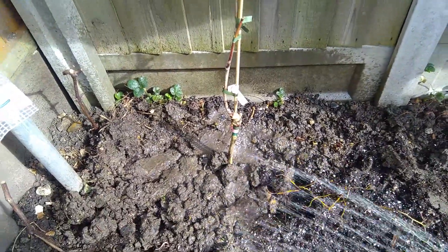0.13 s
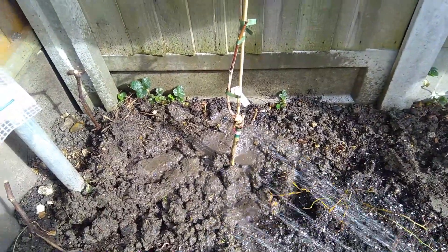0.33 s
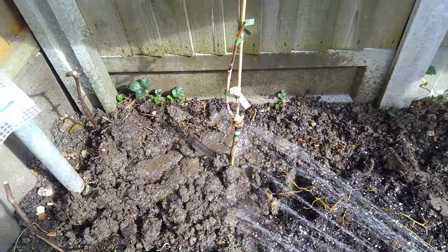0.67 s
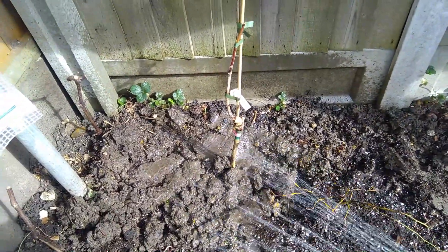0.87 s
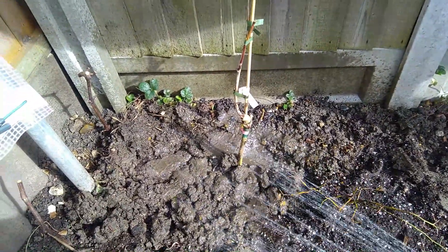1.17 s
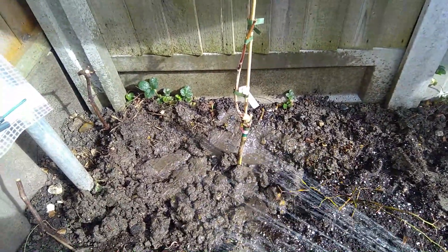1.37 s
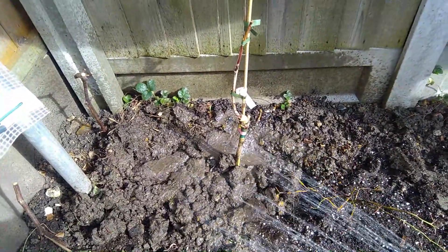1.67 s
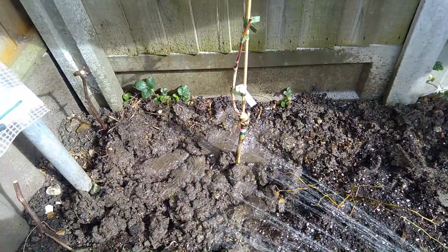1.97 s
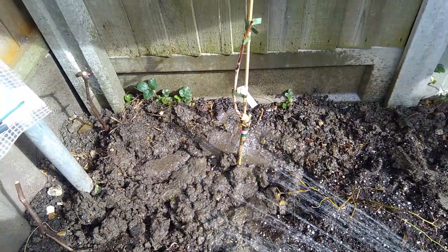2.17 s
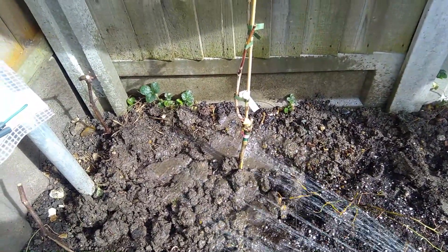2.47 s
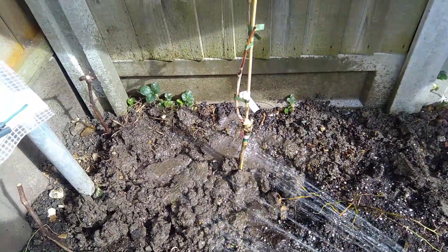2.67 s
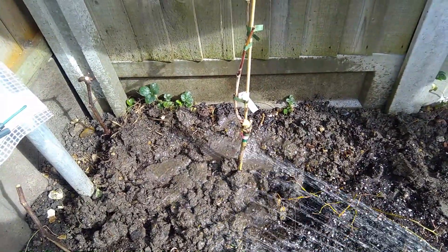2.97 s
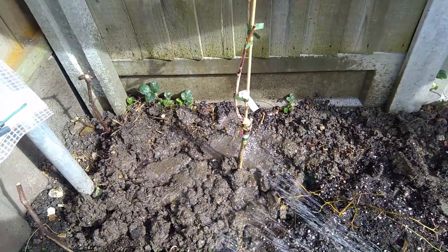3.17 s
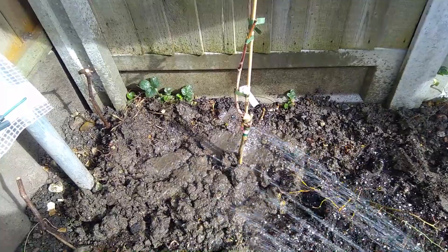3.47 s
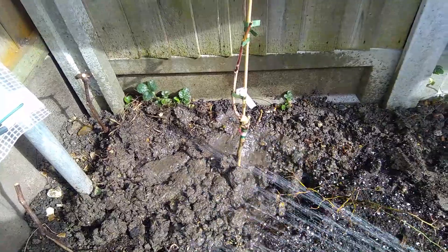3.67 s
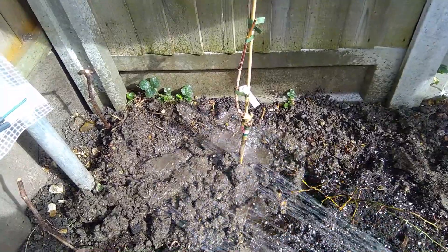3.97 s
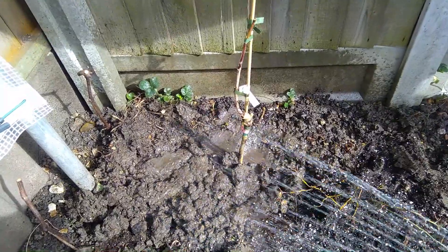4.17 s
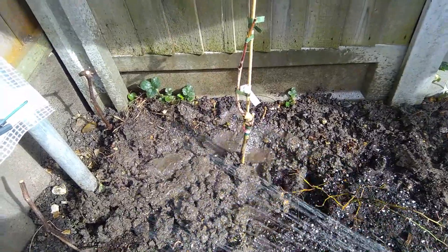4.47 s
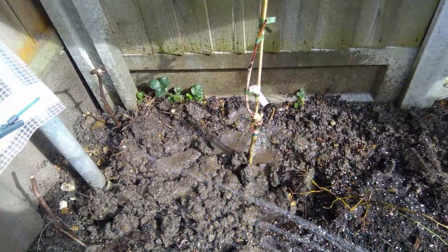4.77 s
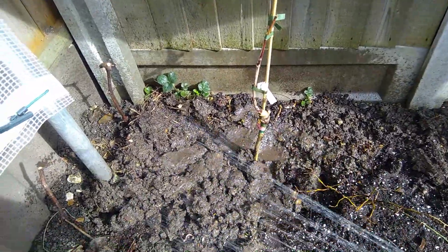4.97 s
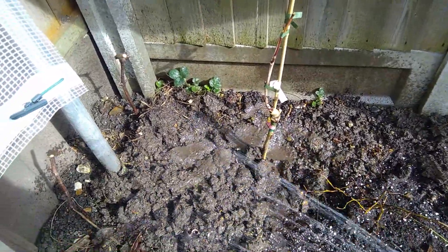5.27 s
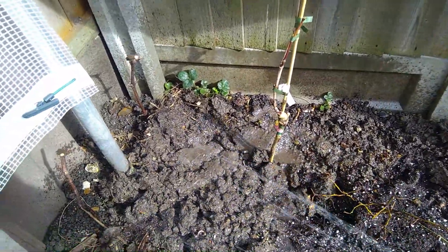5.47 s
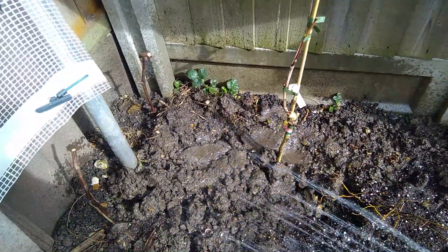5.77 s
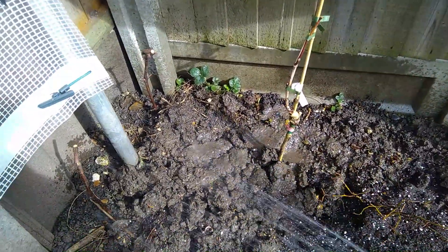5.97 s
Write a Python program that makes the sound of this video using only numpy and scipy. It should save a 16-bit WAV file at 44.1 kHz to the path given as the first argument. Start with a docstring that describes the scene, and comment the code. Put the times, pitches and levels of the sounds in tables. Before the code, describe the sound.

Fine jets of water sprinkle onto wet muddy soil close by, a bright fizzing hiss with crackly spits, tiny ticks and faint puddle plops.

```python
"""Beside a fence, fine jets from a watering rose sprinkle wet soil, close to a phone's left port.
Noise shaped by random droplet impacts, with ringing bubbles, makes a bright fizz in seven pitch slices.
Clumps of water splash with a crack and a spitting tail, and single drops tick as short tone bursts.
Puddles plop with rising sines and a faint hollow note swells once; at the end the jets swing close.
Far behind, narrow bands of noise make a town rumble with soft thuds and an engine hum."""
import sys
import numpy as np
from scipy import signal
from scipy.fft import rfft, irfft, next_fast_len
from scipy.io import wavfile
from scipy.ndimage import uniform_filter1d

SR = 44100
rng = np.random.default_rng(int(sys.argv[2]) if len(sys.argv) > 2 else 0)


def bounce(signal):
    """Save signal as a 16-bit WAV file at the path given by the first command-line argument."""
    frames = np.transpose(np.atleast_2d(signal))
    limited = np.clip(frames, -1, 1)
    pcm = np.round(limited * 32767).astype(np.int16)
    wavfile.write(sys.argv[1], SR, pcm)


N = 269214

# How the jets change. Each row: time in seconds, relative fizz level in dB, extra coarse drops in dB,
# left minus right in dB.
JETS = [(0.0, -57, -0.5, 8.5), (0.85, -56.5, 4, 11), (1.2, -54, 3.5, 9.5), (1.5, -53, 11, 7.5),
        (1.75, -53, 7.5, 10.5), (2.1, -54, 11, 6), (2.3, -53, 6, 7.5), (2.55, -52, 3.5, 10),
        (2.87, -53, 1, 9.5), (3.3, -60, 6, 9.5), (3.6, -62, 2.5, 10), (3.84, -57.5, 6.5, 9.5),
        (4.2, -57, 2, 10), (4.9, -64, 4.5, 9), (5.2, -57, 1, 10), (5.75, -63, 4, 8.5), (6.105, -46, 12, 9)]
# The slices of the spectrum: water washing over mud, then droplets from coarse to finest.
# Each number: an edge between two slices in Hz.
SLICE_EDGES_HZ = [840, 2700, 4400, 5900, 8100, 10000, 12500, 16000]
# The tables below hold one number for each slice, lowest slice first.
# How much more each size favours the left port, in dB.
SIZE_PAN_DB = [-5.5, -5.0, -4.5, -2.0, -1.0, 0.5, 2.0]
# Relative level of the wash and of each droplet size in an even spray, in dB.
SIZE_DB = [-25, -23, -24.5, -11, -12, -2, -1]
# How far each size follows the extra coarse drops, in dB per dB.
COARSE_SHARE = [0, 0.79, 0.75, 1.27, 1.02, 0., 0.08]
# Change of each slice in the steady fizz, in dB; the middle slices are weakest.
FIZZ_TILT_DB = [-2.5, -3, -3, -9.5, -6.5, -4, -3.5]
# How far the hiss of each slice flickers, as a spread in dB.
SLICE_FLICKER_DB = [1.5, 1.3, 2.0, 2.8, 1.9, 0.55, 0.94]
# How many separate drops of each size fall, in drops per second.
PATTER_PER_S = [150., 90., 110., 150., 250., 900., 1500.]
# How alike each size sounds at the two ports, from 0 for unlike to 1 for the same.
SIZE_ALIKE = [0.39, 0.19, 0.018, 0., 0., 0., 0.096]
# Change of a splash's crack in each slice, in dB; a crack holds little bass.
CRACK_DB = [-20, -10, -3, 0, 0, 0, 0]
CRACK_FAR_DB = -6.0  # further change of the crack at the right port
SCATTER_S = 0.003  # how long soil and fence smear the sound for the far port
PATTER_S, PATTER_SHARE = .004, .5  # time constant of each wet grain; the grains' share of the power
LOWEST_DIP = -0.8  # the flicker dips no lower than this many spreads


def spray():
    """The left port faces the water; the right hears it later and scattered off soil and fence."""
    fizz_db, coarse_db, pan_db = curve(JETS)
    flicker_db = walk(14.)
    drops = droplets()
    tails, cracks = splashes(pan_db)
    tails = tails + gush(pan_db)
    out = 0
    for k, (lo, hi) in enumerate(zip(SLICE_EDGES_HZ, SLICE_EDGES_HZ[1:])):
        slice_flicker_db = SLICE_FLICKER_DB[k] * np.maximum(walk(21.99), LOWEST_DIP)
        size_db = SIZE_DB[k] + FIZZ_TILT_DB[k] + COARSE_SHARE[k] * coarse_db
        db = fizz_db + flicker_db + size_db + slice_flicker_db
        power = (ports(pan_db + SIZE_PAN_DB[k]) * undb(db)) ** 2 + tails[:, k]
        power = power * (1 - PATTER_SHARE + PATTER_SHARE * patter(PATTER_PER_S[k]))
        power[1] = smear(power[1], SCATTER_S)

        left, right = level(share(drops, lo, hi), 0)
        alike = np.clip(SIZE_ALIKE[k], 0, 1)
        far = alike * left + np.sqrt(1 - alike ** 2) * right
        wet = np.sqrt(power) * [left, far]
        crack_gain = undb(CRACK_DB[k] + np.array([[0], [CRACK_FAR_DB]]))
        out = out + band(wet, lo / 2, 2 * hi, order=2)
        out = out + share(cracks[:, k], lo, hi) * crack_gain
    return out


def droplets():
    """Droplet impacts crackle, and the air bubbles they trap ring briefly on top."""
    drops = crackle(per_s=900., spread_db=3.3, mist_db=1.0, ring_s=.0003)
    fizzle = bubbles(2500., 9000., cycles=8., spread_db=1.5, count=8000, size=300)
    return level(drops, 0) + undb(-7.) * fizzle


def crackle(per_s, spread_db, mist_db, ring_s):
    """Droplet impacts at random moments, a few much larger, over fine mist; blurred at the far port."""
    sizes_db = spread_db * np.minimum(rng.exponential(size=N), 4.0)
    hits = (rng.random(N) < per_s / SR) * undb(sizes_db)
    bursts = smear(hits ** 2, ring_s)
    bursts = np.array([bursts, smear(bursts, 0.024)]) / bursts.mean()
    return rng.standard_normal((2, N)) * np.sqrt(bursts + undb(2 * mist_db))


def bubbles(lo_hz, hi_hz, cycles, spread_db, count, size=800):
    """Tiny trapped bubbles, each ringing some cycles on a rising note, other ones at each port."""
    where, pitch, chance = rng.random((count, 3)).T
    hz = lo_hz * (hi_hz / lo_hz) ** pitch
    turns = hz[:, None] * np.arange(size) / SR
    ring = np.exp(-turns / cycles) * np.sin(2 * np.pi * turns * (1 + 0.00054 * turns))
    ring *= undb(-spread_db * np.log(chance + 0.0048))[:, None]  # a few are much louder
    # Both ports lie end to end in one long row while the rings are added up.
    places = (where * 2 * N).astype(int)[:, None] + np.arange(size)
    out = np.bincount(places.ravel(), ring.ravel(), 2 * N + size)
    return level(out[:2 * N].reshape(2, N), 0)


def patter(per_s):
    """Separate drops of uneven strength: a power envelope of short dying grains, near 1 on average."""
    grains = (rng.random(N) < per_s / SR) * rng.exponential(size=N)
    return smear(grains, PATTER_S) * SR / per_s


# Clumps of water. Each row: start in seconds, relative tail level in dB, crack over tail in dB,
# pitch of the commonest drops in octaves over 1 kHz, spread of sizes in octaves,
# time for the tail to fall 60 dB in seconds (the last two have a smallest value).
CLUMPS = [(0.0463, -55.5, 7.3, 1.53, 0.072, 0.46), (0.0694, -51.5, 14, 2.6, 0.49, 0.18),
          (0.1364, -55, 9.3, 2.73, 0.46, 0.25), (0.2795, -42, 11, 3.39, 0.25, 0.25),
          (0.3905, -49, 10, 3.3, 0.37, 0.042), (0.402, -54.5, 10, 1.24, 0.29, 0.14),
          (0.4784, -60.5, 3.3, 3.25, 0.2, 0.26), (0.549, -60, 2.5, 2.56, 0.15, 0.45),
          (0.589, -53.5, 5, 2.54, 0.53, 0.1), (0.603, -56, 3, 2.44, 0.42, 0.16),
          (0.664, -64, 3, 1.8, 0.12, 0.067), (0.7467, -65, 19.3, 4.0, 0.2, 0.063),
          (0.796, -52.5, 17.3, 3, 0.98, 0.55), (0.976, -52, 8, 2.46, 0.16, 0.37),
          (1.022, -56, 15.3, 1.36, 1.18, 0.66), (1.25, -45.5, 30, 4.3, 0.42, 0.14),
          (1.29, -41.5, 28.5, 4.6, 0.79, 0.22), (1.306, -53, 8.5, 2.23, 0.22, 0.23),
          (1.3175, -44, 7.3, 4.4, 0.14, 0.098), (1.364, -37.5, 14, 3.62, 0.13, 0.13),
          (1.441, -41.5, 7.3, 3.66, 0.084, 0.33), (1.464, -32.5, 19, 4.7, 0.1, 0.038),
          (1.5285, -44.5, 17, 2.97, 0.24, 0.3), (1.5525, -64, 11.3, 3.9, 0.22, 0.073),
          (1.657, -57, 9.3, 2.06, 0.21, 0.25), (1.769, -50, 6, 2.1, 0.41, 0.21),
          (1.79, -48, 1.3, 2.72, 0.28, 0.4), (1.801, -50, 1.3, 3, 0.5, 0.11),
          (1.8594, -57, -0.7, 1.7, 0.27, 0.076), (1.9256, -47, 9.3, 2.9, 0.36, 0.33),
          (1.9533, -60, 12, 2.8, 0.21, 0.1), (2.008, -49.5, 9.3, 2.23, 0.48, 0.38),
          (2.0326, -46.5, 9, 2.7, 0.25, 0.11), (2.0494, -46, 9.3, 3.1, 0.16, 0.11),
          (2.092, -49, 0, 2.84, 0.31, 0.23), (2.14, -52.5, -1.5, 3.5, 0.25, 0.12),
          (2.203, -46.5, 17, 4.3, 1.1, 0.059), (2.215, -56, 4.5, 2.6, 0.17, 0.58),
          (2.2644, -51, 7.3, 5.1, 1, 0.13), (2.3194, -54, 3.3, 5.7, 0.91, 0.09),
          (2.535, -62.5, 11.3, 1.06, 0.4, 0.29), (2.6209, -48.5, 15.3, 3.25, 0.22, 0.065),
          (2.781, -55, 5.5, 2.57, 0.18, 0.28), (2.8105, -50, 13.3, 2.8, 0.5, 0.053),
          (2.8943, -53, 26, 4.0, 0.29, 0.062), (3.035, -55.5, 3, 2.18, 0.58, 0.37),
          (3.303, -57.5, 13.3, 3, 0.65, 0.13), (3.3977, -58, 13.3, 4.3, 0.31, 0.18),
          (3.419, -54, 29, 4.1, 0.2, 0.09), (3.47, -53.5, 15, 4.7, 0.27, 0.066),
          (3.5025, -54.5, 4, 3.65, 0.4, 0.19), (3.5638, -59, 23, 3.8, 0.9, 0.44),
          (3.6044, -56, 7.3, 1.5, 1.5, 0.64), (3.662, -40.5, 1.3, 3.035, 0.13, 0.1),
          (3.6704, -38.5, 9.3, 3.9, 0.36, 0.12), (3.6964, -50.5, 9.3, 2.5, 0.48, 0.42),
          (3.7276, -52, 11.3, 1.5, 1.05, 0.55), (3.7804, -55.5, 3.3, 1.3, 0.41, 0.16),
          (3.8427, -53.5, 15, 2.8, 0.63, 0.85), (3.917, -50.5, 11.3, 2.8, 0.57, 0.09),
          (4.149, -57.5, 17, 2.5, 0.73, 0.31), (4.264, -56, 15.3, 3.6, 0.37, 0.11),
          (4.348, -52, 23, 4.0, 0.27, 0.09), (4.4294, -55, 3.3, 2.7, 0.59, 0.33),
          (4.548, -45.5, 10, 2.93, 0.33, 0.1), (4.555, -36, 8, 3.32, 0.24, 0.13),
          (4.595, -45, 18, 3.47, 0.35, 0.17), (4.744, -54.5, 7, 1.2, 1.4, 0.11),
          (4.9587, -40, 25, 4.5, 0.13, 0.067), (4.998, -47.5, 27.5, 3.7, 0.13, 0.07),
          (5.088, -59.5, 3, 2.78, 0.42, 0.57), (5.143, -43.5, 11, 3.5, 0.3, 0.1),
          (5.219, -47.5, 8, 2.87, 0.34, 0.29), (5.238, -42.5, 8, 3, 0.28, 0.15),
          (5.2706, -49, 7.3, 3.1, 0.18, 0.14), (5.47, -56, 0, 4.4, 0.42, 0.3),
          (5.5553, -54.5, 20.5, 3.5, 0.38, 0.069), (5.609, -63, 11.3, 2.1, 0.24, 0.12),
          (5.822, -50, 5, 3.65, 0.097, 0.17), (5.9549, -60, 9.5, 5.8, 0.42, 0.55),
          (6.0955, -28, 0, 3.64, 0.18, 0.07)]
STRAY_DB = -21  # drops of every other size that come along in a splash
LEAD_S, LEAD_SHARE = .004, .08  # the first drops arrive ahead of each clump: time constant, share of power


def splashes(pan_db):
    """Per port and droplet size: the power of lead-in and tail, and the sharp crack between them."""
    t = np.arange(N) / SR
    tails = np.zeros((2, len(SIZE_PAN_DB), N))
    cracks = np.zeros_like(tails)
    # A crack lasts under a millisecond and opens with one hard edge.
    burst = rng.choice([-1., 1.], (len(CLUMPS), 40)) * 0.4 * np.exp(-np.arange(40) / 9)
    burst[:, 0] = 1.5
    for (s, db, crack_db, pitch, spread, t60), snap in zip(CLUMPS, burst):
        i = min(int((s + .001) * SR), N - 40)  # the crack comes just after the onset
        gains = ports(pan_db[i] + np.array(SIZE_PAN_DB)) * undb(db) * sizes(pitch, spread, STRAY_DB)
        near = slice(max(i - SR // 20, 0), i + SR // 3)
        since = t[near] - t[i]
        lead = LEAD_SHARE * np.exp(np.minimum(since, 0) / LEAD_S)
        tail = undb(-120 * since / max(t60, .02))  # 120 because this is a power
        tails[:, :, near] += gains[..., None] ** 2 * np.where(since < 0, lead, tail)
        cracks[:, :, i:i + 40] += gains[..., None] * undb(crack_db) * snap
    return tails, cracks


def sizes(pitch, spread, stray_db):
    """Gain of each droplet size in a clump of water: most near one size, a few strays of all."""
    # Middle of each slice, in octaves over 1 kHz
    octave = np.log2(np.multiply(SLICE_EDGES_HZ[1:], SLICE_EDGES_HZ[:-1]) / 1e6) / 2
    common = np.exp(-((octave - min(pitch, octave[-1])) / max(spread, .1)) ** 2 / 2)
    power = undb(2 * np.array(SIZE_DB)) * (common + undb(2 * stray_db))
    return np.sqrt(power / power.sum())


GUSH_S, GUSH_RISE_S, GUSH_DB = 5.97, 0.03, -35  # the jets swing close and stay
GUSH_OCTAVES, GUSH_SPREAD = 4.5, 0.42  # commonest drops in octaves over 1 kHz, spread in octaves
GUSH_STRAY_DB = -4  # the close jets churn more mud


def gush(pan_db):
    """Per port and droplet size: the power of the jets close by, rising quickly and then steady."""
    rise = np.clip((np.arange(N) / SR - GUSH_S) / GUSH_RISE_S, 0, 1) ** 2
    mix = sizes(GUSH_OCTAVES, GUSH_SPREAD, GUSH_STRAY_DB)
    gains = ports(pan_db[-1] + np.array(SIZE_PAN_DB)) * undb(GUSH_DB) * mix
    return (gains[..., None] * rise) ** 2


# Single drops that snap out of the fizz.
# Each row: time in seconds, peak level at the left before filtering in dB, pitch in Hz.
SINGLE_DROPS = [(0.0106, -43, 12200), (0.0296, -36.6, 13200), (0.0538, -37, 13600), (0.0733, -31.8, 8900),
                (0.2028, -38, 12300), (0.3113, -27, 10600), (0.3631, -41, 12800), (0.391, -28.5, 12100),
                (0.4398, -33, 12500), (0.489, -37, 8800), (0.5349, -41, 13800), (0.5626, -35, 12300),
                (0.5957, -34, 11600), (0.6474, -35.9, 11800), (0.6715, -42, 12900), (0.8308, -34, 11800),
                (0.8482, -30, 12200), (0.8669, -34.1, 12300), (1.0215, -32, 12200), (1.2344, -33, 10700),
                (1.2505, -27, 11000), (1.2654, -30, 13500), (1.4242, -27, 12200), (1.5292, -21, 10500),
                (1.5343, -24, 11300), (1.6413, -31, 10900), (1.6567, -28.0, 13300), (1.7576, -23, 14100),
                (1.9321, -34, 8900), (2.1558, -31, 10100), (2.2067, -26.2, 13600), (2.3247, -37, 12700),
                (2.581, -30.3, 13100), (2.816, -29.5, 12000), (2.8945, -30, 12000), (2.909, -35, 11500),
                (3.0664, -33.1, 12700), (3.138, -29, 12700), (3.2793, -36, 12500), (3.4205, -31, 12500),
                (3.4459, -41, 12700), (3.4729, -41, 12400), (3.4941, -42, 13200), (3.5094, -29, 12300),
                (3.5655, -35, 11500), (3.6272, -32, 11500), (3.7459, -34, 12400), (3.7921, -34, 11800),
                (3.9167, -31, 11900), (4.031, -35, 12200), (4.0727, -42, 13000), (4.1534, -40, 11600),
                (4.1959, -31, 12200), (4.2436, -33, 12100), (4.3308, -43, 13100), (4.3629, -38, 13500),
                (4.439, -40, 11200), (4.55, -23, 12300), (4.5553, -15, 10400), (4.5966, -22, 11100),
                (4.673, -37, 12800), (4.8824, -40.7, 12500), (4.9238, -36, 12700), (4.9605, -26, 13500),
                (5.0062, -31, 14400), (5.0863, -37.3, 13700), (5.1738, -32.3, 12700), (5.2403, -33, 8800),
                (5.2525, -36, 8000), (5.2725, -32, 8000), (5.2816, -31, 10900), (5.5464, -38.1, 12100),
                (5.6149, -35, 13700), (5.6816, -46, 12700), (5.7074, -44, 12200), (5.7446, -36, 13100),
                (5.8252, -37, 13500), (5.9126, -49, 12400), (5.9555, -41.5, 13000)]
TICK_CYCLES = 1.7  # cycles from the middle until the snap has shrunk to 1/e
TICK_FAR_DB = -3.5  # extra change at the right port


def ticks():
    """Each drop is a few cycles of tone at the left port, a weaker scattered puff at the right."""
    out = np.zeros((2, N))
    t = np.arange(-40, 200) / SR
    pan_db = curve(JETS)[-1]
    puffs = rng.standard_normal((len(SINGLE_DROPS), len(t))) * np.exp(-np.abs(t) / 0.0013) * (t > 0)
    for (s, db, hz), puff in zip(SINGLE_DROPS, puffs):
        i = int(s * SR) - 40  # the snap is centred on its time
        snap = np.exp(-(t * hz / TICK_CYCLES) ** 2) * np.cos(2 * np.pi * hz * t)
        far = undb(TICK_FAR_DB - pan_db[i]) * np.convolve(puff, snap, "same") / 2
        out[:, i:i + len(t)] += undb(db) * np.array([snap, far])
    return band(out, 5000., 20000., order=4)


# Puddle gurgles. Each row: start in seconds, level before swell, decay and port gains in dB,
# starting pitch in Hz.
GURGLES = [(0.969, -63, 250), (1.148, -58, 261), (1.201, -55, 312), (1.765, -55.5, 195), (1.77, -55, 260),
           (1.785, -55, 328), (1.825, -53, 260), (1.878, -58.5, 320), (2.185, -52, 201), (2.04, -57.5, 270),
           (2.1, -60, 215), (2.2, -55.5, 235), (2.296, -53.5, 276), (2.88, -57, 300), (2.959, -54.5, 323),
           (2.985, -53.5, 244), (3.459, -67, 197), (3.899, -54, 312), (4.294, -52, 325),
           (4.555, -59.5, 264), (4.62, -56.5, 586), (4.656, -56, 520), (4.672, -54, 610), (4.695, -60, 281),
           (4.72, -68, 690), (4.814, -61, 284)]
PLOP_T60_S, PLOP_RAGGED, PLOP_GLIDE_PER_S = .11, .4, 1.2  # 60 dB decay, depth of wobble, upward glide


def plops():
    """Air pockets in the puddles: short low gurgles on a rising note, a little ragged."""
    out = np.zeros(N)
    t = np.arange(int(.3 * SR)) / SR
    ragged = level(band(rng.standard_normal(N), 5., 40., order=1), 0)
    swell = (1 - np.exp(-t / .012)) ** 2
    for s, db, hz in GURGLES:
        i = int(s * SR)
        note = np.sin(2 * np.pi * hz * t * (1 + PLOP_GLIDE_PER_S * t))
        out[i:i + len(t)] += undb(db - 60 * t / PLOP_T60_S) * swell * note
    return out * (1 + PLOP_RAGGED * ragged) * undb([[4.2], [1.8]])


HOLLOW_START_S, HOLLOW_END_S = 4.5, 5.03
HOLLOW_ATTACK_S, HOLLOW_RELEASE_S = .3, .1
HOLLOW_HZ, HOLLOW_WIDTH_HZ = 775, 35
HOLLOW_DB = -70  # before the swell


def hollow():
    """A faint blurred hollow note: narrow noise that swells slowly and fades faster."""
    t = np.arange(N) / SR
    rise = (t - HOLLOW_START_S) / HOLLOW_ATTACK_S
    fall = (HOLLOW_END_S - t) / HOLLOW_RELEASE_S
    lo, hi = HOLLOW_HZ - HOLLOW_WIDTH_HZ / 2, HOLLOW_HZ + HOLLOW_WIDTH_HZ / 2
    blur = band(rng.standard_normal((2, N)), lo, hi, order=1)
    return level(blur, HOLLOW_DB) * np.clip(np.minimum(rise, fall), 0, 1)


# The far rumble, as points on a curve. Each row: pitch in Hz, relative level in dB per Hz.
TOWN_SPECTRUM = [(59, -31), (100, -7.5), (156, -2), (323, -2), (400, -12), (764, -3), (1960, -19),
                 (2500, -38), (3250, -50), (5500, -120)]
# How alike the rumble is at the two ports. Each row: pitch in Hz,
# likeness from 0 for unlike to 1 for the same (limited to that range).
TOWN_ALIKE = [(60, -0.8), (130, 0.94), (290, 0.78), (640, 0.2), (1410, -4.4), (3100, -3.04), (6820, -0.55),
              (15000, -0.01)]
TOWN_DB = -70  # before a small tilt to the left


def town():
    """Far rumble in third-octave bands of noise that flicker alone; alike at both ports in the bass."""
    f, db = np.transpose(TOWN_SPECTRUM)
    alike_hz, alike = np.transpose(TOWN_ALIKE)
    out = 0
    for hz in 100 * 2 ** np.arange(0, 4.7, 1 / 3):
        c = np.clip(np.interp(np.log(hz), np.log(alike_hz), alike), 0, 1)
        lo, hi = hz * 2 ** (-1 / 6), hz * 2 ** (1 / 6)
        mid, side = (band(rng.standard_normal(N), lo, hi, order=1) for _ in range(2))
        gain = undb(np.interp(np.log(hz), np.log(f), db) + 1.8 * walk(6.))
        # The side sound has opposite signs at the ports, which makes them differ.
        out = out + gain * (np.sqrt(1 + c) * mid + np.sqrt(1 - c) * side * np.array([[1], [-1]]))
    return level(out, TOWN_DB) * undb([[.6], [-.6]])


# Low thuds. Each row: start in seconds, level at its height in dB.
SOFT_THUDS = [(0.0, -60), (1.72, -59.5), (2.026, -64.5), (2.512, -62), (2.649, -62.5), (2.783, -61.5),
              (3.416, -66), (3.613, -63), (3.69, -57), (4.12, -57), (4.333, -58), (4.665, -68),
              (5.095, -66), (5.752, -64), (6.07, -60)]
# The engine's low note in the first row, then two higher hum tones.
# Each row: pitch in Hz, width in Hz, level in dB (before wavering, for the higher tones).
ENGINE = [(67.5, 5.9, -73.5), (135.8, 1.5, -82.5), (317.5, 5.7, -89.5)]
THUD_S = 0.05  # each thud is highest halfway through this time
RUMBLE_DB = -75.5  # level of the low noise between thuds


def rumble():
    """A low engine note and a rumble that bumps up in soft thuds, nearly alike at both ports."""
    t = np.arange(N) / SR
    low = level(band(rng.standard_normal(N), 45.0, 76.0, order=2), 0)
    power = undb(2 * RUMBLE_DB)
    for s, db in SOFT_THUDS:
        power = power + undb(2 * db) * np.exp(-((t - s) / THUD_S * 2 - 1) ** 2)
    unlike = level(band(rng.standard_normal((2, N)), 27.0, 89.0, order=2), -83.5)
    return low * np.sqrt(power) + blurred_tone(*ENGINE[0]) + unlike


def hum():
    """Two higher tones of the distant hum, wavering a little together."""
    waver = undb(1.5 * walk(2.))
    return waver * sum(blurred_tone(*row) for row in ENGINE[1:])


def blurred_tone(hz, width_hz, db):
    """A blurred tone: noise squeezed into a narrow band."""
    return level(band(rng.standard_normal(N), hz - width_hz / 2, hz + width_hz / 2, order=1), db)


def undb(db):
    """Gain of a level in dB."""
    return 10 ** (np.asarray(db) / 20)


def level(x, db):
    """Scales a sound to an rms level."""
    return x * undb(db) / np.sqrt(np.mean(x ** 2))


def band(x, lo_hz, hi_hz, order=3):
    """Band-pass between two edges."""
    edges = [lo_hz, min(hi_hz, .45 * SR)]
    return signal.sosfilt(signal.butter(order, edges, "band", fs=SR, output="sos"), x)


def share(x, lo_hz, hi_hz, order=20):
    """One slice of the spectrum; neighbouring slices add up without a gap, low edges slope more gently."""
    size = next_fast_len(x.shape[-1])
    f = np.arange(size // 2 + 1) * SR / size + 1e-9
    low_cut = 1 + (lo_hz / f) ** min(order, lo_hz / 400)
    high_cut = 1 + (f / hi_hz) ** min(order, hi_hz / 400)
    return irfft(rfft(x, size) / low_cut / high_cut, size)[..., :x.shape[-1]]


def walk(rate):
    """Random levels held 1 / rate s and slewed twice; spread near 1."""
    k = int(SR / rate)
    steps = np.repeat(rng.standard_normal(N // k + 1), k)
    return 1.89 * uniform_filter1d(uniform_filter1d(steps, k), k)[:N]


def curve(table):
    """Columns of a table after its times, joined by straight lines, one value a sample."""
    s, *columns = np.transpose(table)
    return np.array([np.interp(np.arange(N) / SR, s, c) for c in columns])


def smear(power, seconds):
    """Lets a power envelope die away over a time constant."""
    keep = np.exp(-1 / (seconds * SR))
    return signal.lfilter([1 - keep], [1, -keep], power)


def ports(pan_db):
    """Left and right gains for a sound unlike at the ports, keeping the power of their mean."""
    right = undb(-np.asarray(pan_db))
    return 2 * np.array([np.ones_like(right), right]) / np.sqrt(1 + right ** 2)


def scene():
    """Water in front, the town far behind."""
    return spray() + ticks() + plops() + hollow() + town() + rumble() + hum()


def record(dry):
    """The phone cuts the top: a steep low-pass at 15680 Hz."""
    return signal.sosfilt(signal.ellip(10, .2, 70, 15680, fs=SR, output="sos"), dry)


dry = scene()
out = record(dry)
bounce(out)
```